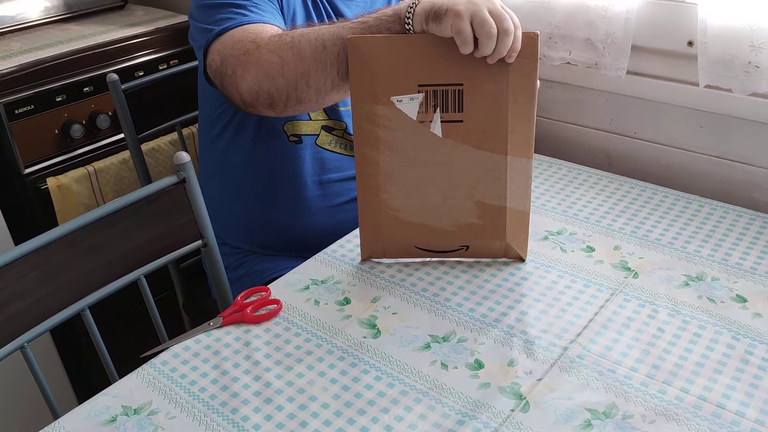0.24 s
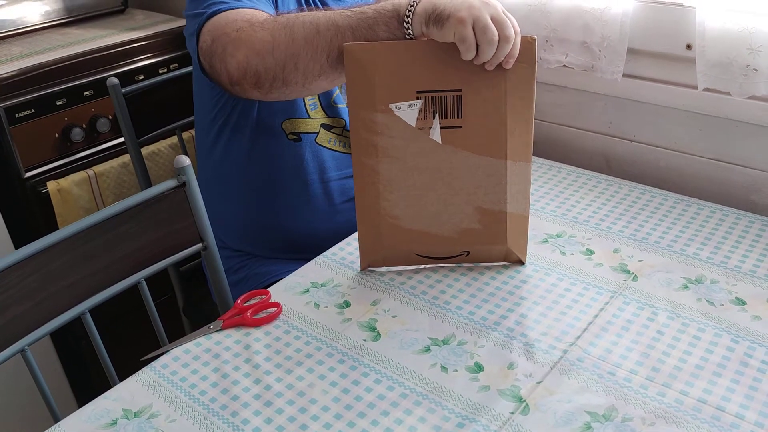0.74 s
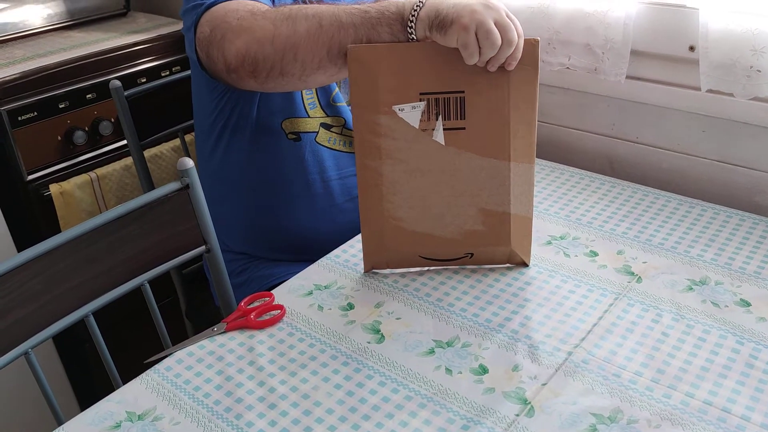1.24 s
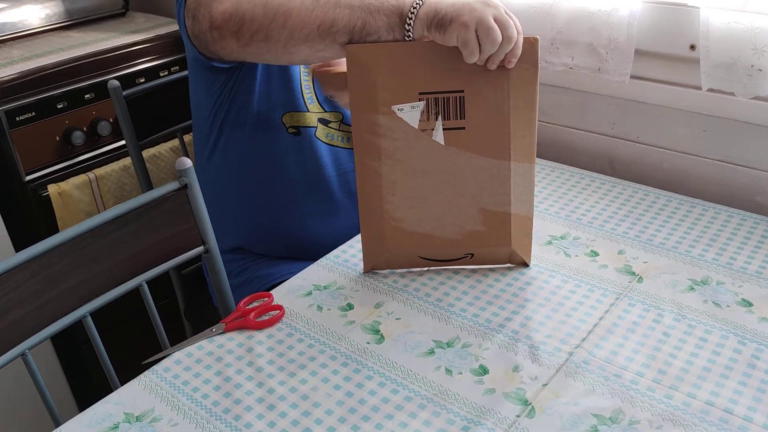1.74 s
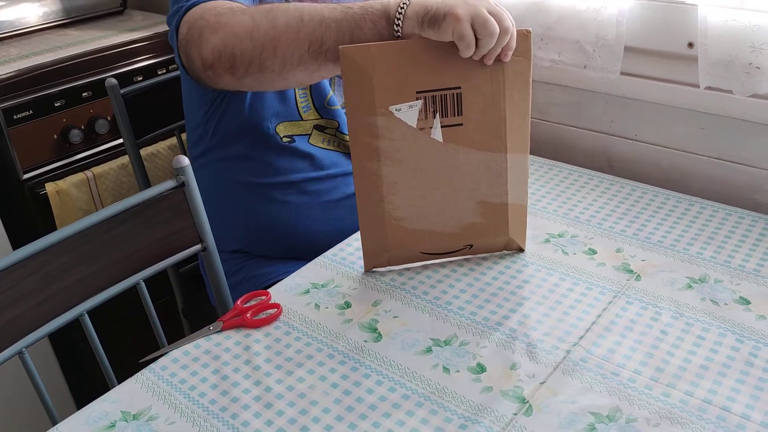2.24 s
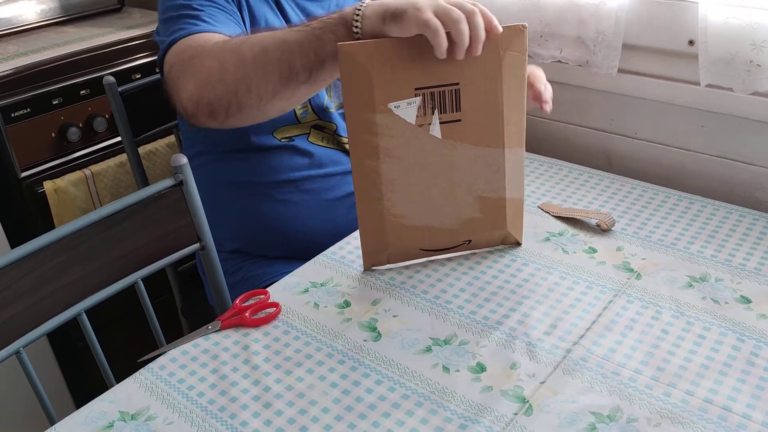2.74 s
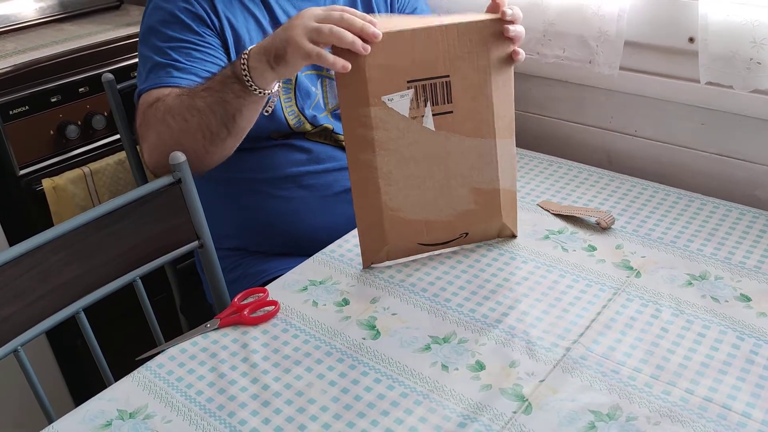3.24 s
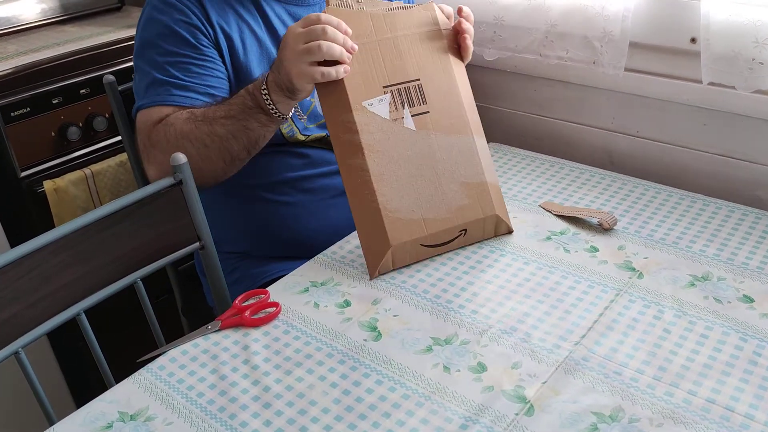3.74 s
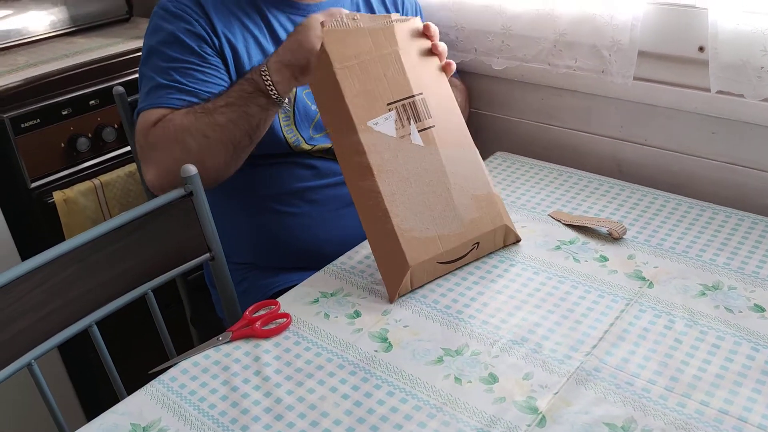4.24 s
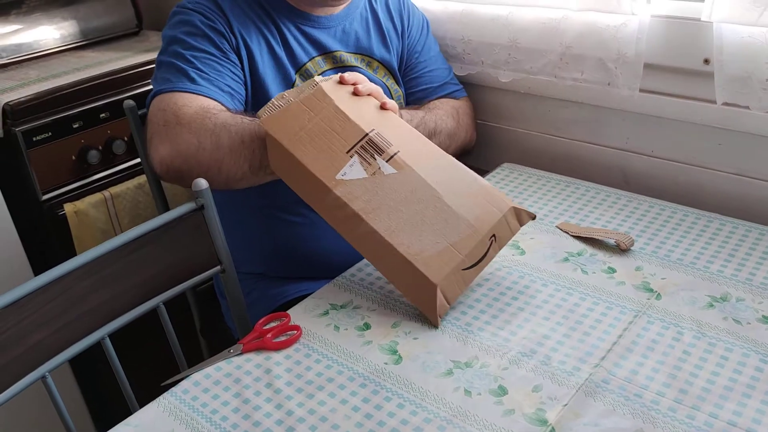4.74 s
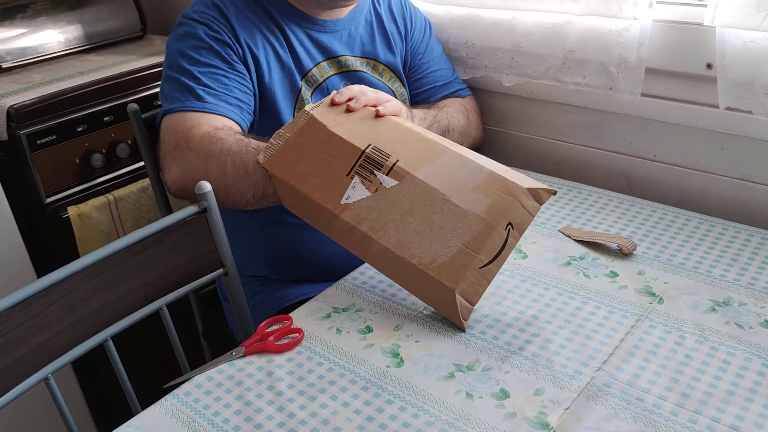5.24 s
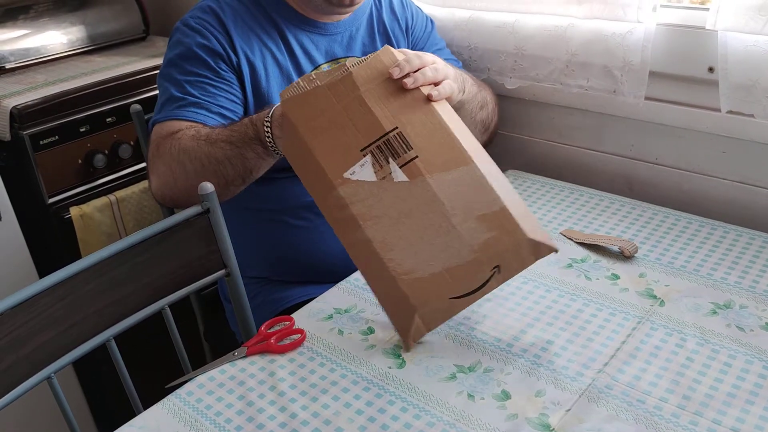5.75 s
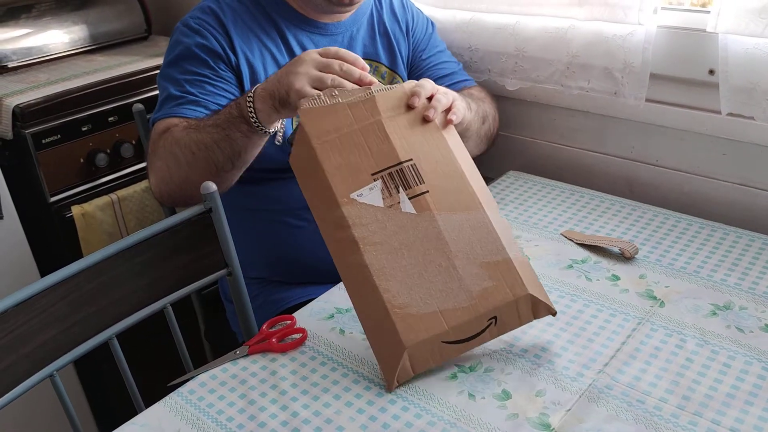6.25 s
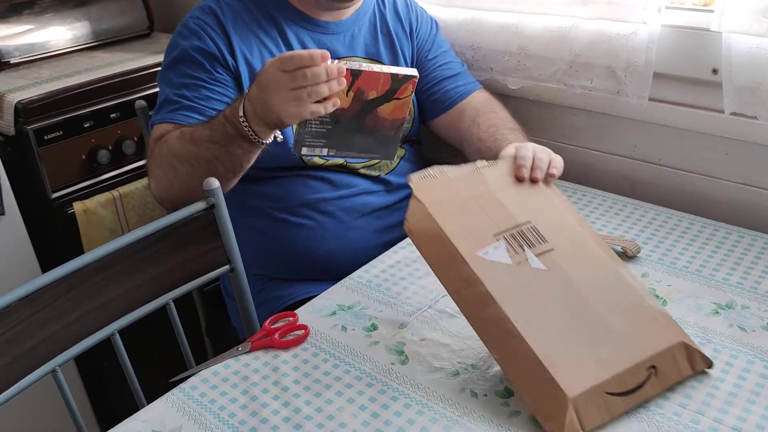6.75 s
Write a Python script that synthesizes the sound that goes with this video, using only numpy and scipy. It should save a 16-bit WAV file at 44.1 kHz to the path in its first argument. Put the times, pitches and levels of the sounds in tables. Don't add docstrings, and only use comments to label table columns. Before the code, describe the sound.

In a quiet kitchen, stiff cardboard tears in crackling bursts, followed by dry rubbing, creaking folds and small clicks while hands work something out.

```python
import sys
import numpy as np
from scipy import signal
from scipy.fft import rfft, irfft, next_fast_len
from scipy.io import wavfile
from scipy.ndimage import uniform_filter1d, map_coordinates

SR = 44100
rng = np.random.default_rng(int(sys.argv[2]) if len(sys.argv) > 2 else 0)


def file_out(sig):
    cols = np.atleast_2d(sig).T
    lim = np.clip(cols, -1, 1)
    pcm = np.round(lim * 32767).astype(np.int16)
    wavfile.write(sys.argv[1], SR, pcm)


def natural_amplitude(level_db):
    exponent = np.asarray(level_db, float) / 20
    return 10 ** exponent


N = 309141

# freq_hz, density_db_per_hz
HUSH_SPECTRUM = [(59, -30.5), (100, -10.5), (229, -8), (295, -3.5), (350, -6), (1060, -12), (3300, -22.5),
                 (8000, -22.5), (11400, -50.5), (13200, -31.5), (16000, -27)]
# freq_hz, left_right_likeness
HUSH_LIKENESS = [(60, -2.5), (240, 0.91), (950, 0.25), (3770, 0), (15000, -0.3)]
HUSH_DB = -61

# freq_hz, level_db
THUD_SPECTRUM = [(40, -32), (60, -4), (100, -2.5), (140, -2), (200, -14), (300, -51.5)]
# freq_hz, level_db
SWAY_SPECTRUM = [(3, 5), (25, -13.5), (41, -11), (49, -2), (58, -16), (70, -24), (120, -46)]
# time_s, level_db
BUMPS = [(0.108, -56.5), (0.51, -61.5), (0.64, -64), (0.879, -51.5), (1.25, -52), (1.42, -47), (1.65, -47),
         (1.72, -44), (1.828, -46), (2.1, -79), (2.22, -69), (2.319, -69.5), (2.7, -59), (3.28, -62),
         (3.49, -61), (3.77, -52.5), (3.88, -72), (4.07, -79), (4.45, -65), (4.76, -61.5), (4.96, -62.5),
         (5.25, -52), (5.54, -52.5), (5.93, -53), (6.15, -69), (6.44, -54), (7.0, -68)]
# time_s, length_s, level_over_sway_db
LURCHES = [(0.1, 0.036, 7.3), (2.32, .05, 10), (3.75, 0.035, 9.3), (3.93, .1, 4)]
LURCH_HZ = 16
LEAN_DB_PER_S, SETTLE_DB_PER_S, STILL_DB = 227, 142.5, -71.5
SWAY_DB, SWAY_SWING_DB = -59, 1.5

# freq_hz, level_db
SKIN_SPECTRUM = [(2000, -27.5), (3000, -8.5), (4200, -1.5), (5500, -2), (7000, 2), (8150, -1.5),
                 (8600, -14), (9500, -14.5), (11000, -12.5), (15000, -11), (17000, -20)]
# freq_hz, width_hz, level_db
HELD_FACE_MODES = [(1380, 800, 16), (2490, 1200, 16)]
# freq_hz, width_hz, level_db
SLEEVE_MODES = [(96.5, 13, -6), (195.2, 32, -4), (310, 32, -6), (420, 26, 2), (700, 310, -4),
                (850, 263, 0.5)]
# start_s, length_s, fibre_db, grip_db, sleeve_note_hz
PICKING = [(0.07, 0.026, -74, -23, 303), (0.0, 0.012, -61, 9, 540), (0.045, 0.029, -67, -18, 293),
           (0.12, 0.039, -81, 19.5, 307), (0.3, 0.25, -60.5, -8, 460), (0.425, 0.061, -60, 9, 425),
           (0.478, 0.053, -51.5, 4.5, 430), (0.54, 0.075, -50, -3, 537), (0.68, 0.09, -53.5, 3, 426),
           (0.81, 0.066, -55.5, 6.5, 606), (0.858, 0.008, -39, -0.5, 635), (0.94, 0.02, -60, -13.5, 456),
           (1.09, 0.056, -53.5, 1.5, 560), (1.236, 0.15, -40, -12, 497), (1.34, 0.081, -33, -12.5, 462)]
# start_s, length_s, fibre_db, grip_db, sleeve_note_hz
HANDLING = [(2.554, 0.089, -48, -15.5, 330), (2.676, 0.049, -48.5, -0.5, 360), (2.729, 0.2, -50.5, -9, 510),
            (2.879, 0.086, -48, 2.5, 520), (2.96, 0.25, -46, -3.5, 507), (3.169, 0.13, -54.5, -1, 330),
            (3.239, 0.066, -61, 2.5, 325.7), (3.32, 0.067, -53.5, 3, 665), (3.421, 0.028, -44.5, -1.5, 564),
            (3.48, 0.094, -54, 0, 403), (3.599, 0.044, -49, -0.5, 663), (3.75, 0.058, -63, 8.5, 310),
            (3.842, 0.059, -52.5, 9, 684), (3.96, 0.077, -49, -1.5, 530), (3.999, 0.032, -49.5, -2.5, 480.6),
            (4.06, 0.052, -58.5, -3, 509), (4.164, 0.09, -81, 27, 810), (4.259, 0.18, -62.5, 4, 509),
            (4.43, 0.061, -40.5, -18, 484), (4.46, 0.072, -41, -16, 486), (4.549, 0.17, -39.5, 0, 700),
            (4.698, 0.24, -47, 3.5, 670), (4.951, 0.022, -41, 0.5, 487), (5.002, 0.14, -47, 2, 550),
            (5.15, 0.25, -49, 9.5, 520), (5.359, 0.1, -44, 7, 470), (5.417, 0.2, -40, -3, 492),
            (5.589, 0.26, -44.5, 0, 597), (5.748, 0.13, -43, -16, 410), (5.8, 0.14, -39.5, -8.5, 420),
            (5.93, 0.087, -48.5, 0, 437), (6.04, 0.4, -54.5, 2.5, 570), (6.117, 0.17, -49, -0.5, 584),
            (6.3, 0.31, -45.5, -5, 617), (6.49, 0.28, -54.5, -7, 836), (6.599, 0.058, -46.5, -8, 600),
            (6.68, 0.19, -45.5, -6, 670), (6.88, 0.034, -48.5, -19, 440), (6.975, 0.065, -49.5, 8, 550)]
# start_s, length_s, fibre_db, grip_db, sleeve_note_hz
SCRAPES = [(1.98, 0.19, -53.5, 5, 700), (2.83, 0.059, -51.5, 9, 560), (3.63, 0.047, -46, 14, 780),
           (4.242, 0.13, -67, 16, 453), (6.165, 0.083, -54.5, 6, 600)]
# start_s, length_s, fibre_db, grip_db, sleeve_note_hz
SQUEEZES = [(2.903, 0.077, -72, 2, 340), (4.453, 0.03, -61, 18.5, 454), (4.58, 0.032, -51, 16, 690),
            (4.62, 0.095, -59, 18.5, 400), (5.254, 0.026, -55, 10, 680), (3.2, 0.025, -62.5, 13, 440),
            (4.97, 0.037, -66, 8, 490), (5.385, 0.027, -55, 15, 440), (4.19, 0.033, -78, 18, 450),
            (7.3, 0.018, -62, 14, 330), (5.46, 0.068, -53, -6, 470), (5.815, 0.065, -53.5, 15, 450),
            (6.488, 0.12, -58.5, 21, 900)]
RESTING_DB = [-82.5, -83.5, -77.5]
# time_s, pitch_hz
FACE_NOTE = [(0, 1480), (2.0, 1900), (2.3, 1900), (2.7, 1503), (3.0, 1770), (3.45, 1630), (3.68, 2200),
             (3.9, 1210), (4.05, 2036), (4.219, 1200), (4.6, 1660), (4.97, 2270), (5.45, 1570),
             (5.62, 1585), (5.85, 2450), (6.149, 1340), (6.28, 1450), (7, 1900)]
TOUCH_S, TIRE_DB_PER_S, LIFT_DB_PER_S = 0.0052, 24, 259.5
SWELL_SHARE = 0.11
FACE_GRIP, SLEEVE_GRIP, SLEEVE_DB = 0.58, 1.25, -4
SCRAPE_SLEEVE_DB = -21
SQUEEZE_FACE_DB, SQUEEZE_WALLS_DB = -21, -9
LET_GO_S, LET_GO_DB = (2.18, 2.555), -4.5
HELD_WALLS_DB, AIR_DB, AIR_WIDTH_HZ = -0.5, 15.5, 100
FACE_DB, FACE_WIDTH_HZ = 8, 600

# freq_hz, width_hz, level_db
GLOSS_MODES = [(5800, 1800, 0)]
NAIL_S, NAIL_DB, NAIL_T60_S = 0.045, -56.5, 0.13

# freq_hz, level_db
CRACK_SPECTRUM = [(2200, -43.5), (3200, -3.5), (4500, 13.5), (6000, 4.5), (8100, 7.5), (8700, -14),
                  (9700, -16.5), (15000, -5), (17000, -20)]
# freq_hz, width_hz, level_db
POP_MODES = [(1020, 580, -1), (1610, 180, 3.5), (1770, 320, 0.5), (2540, 240, 0.5), (3420, 610, -11),
             (4300, 930, -15.5)]
# time_s, peak_db, fibre_rel_db, sleeve_pitch_hz
POPS = [(0.7113, -34, -31, 686), (0.8719, -23.5, 8, 302), (1.105, -41, -10, 490), (1.6068, -24, 10.5, 790),
        (1.801, -18, 4, 395), (2.6766, -36, -17, 296), (3.241, -31, -7, 310), (3.891, -28.5, 0, 914),
        (4.553, -18, 0.5, 765), (4.558, -27, -10, 330), (5.1671, -27, -3, 335)]
# time_s, peak_db, fibre_rel_db, sleeve_pitch_hz
FLICKS = [
    (0.05, -47, 0, 465),
    (0.462, -43, 5, 350),
    (0.4825, -24, -10, 310),
    (1.2765, -26, 7, 600),
    (2.565, -58, 11, 754),
]
# time_s, peak_db, fibre_rel_db, sleeve_pitch_hz
CRUMPLES = [(0.322, -49, 0, 320), (0.5816, -36.5, -23, 338), (0.6054, -33, -6, 850),
            (1.07, -39.5, -32, 250), (1.3652, -10, -32.5, 795), (1.8264, -6, -34, 426),
            (3.447, -34, 7.5, 357), (3.4555, -26, -11, 680), (4.9575, -36, 2.5, 424),
            (6.9865, -26, -2, 493)]
# time_s, peak_db, fibre_rel_db, sleeve_pitch_hz
KNOCKS = [(1.2357, -50.5, 19, 332), (3.484, -49, -19, 298), (3.757, -53, -18, 193), (4.188, -54, -16, 407),
          (4.221, -60.5, -19, 490), (4.2542, -54, -26, 500), (5.3715, -26, -9, 440),
          (5.3914, -37, 8.5, 435), (4.961, -51, -10, 460), (4.985, -49.5, -10, 491), (5.852, -55, -10, 426),
          (6.198, -57, -15, 305), (6.584, -57, -15, 259), (5.9384, -44, -9, 330), (6.134, -48.5, 2, 840),
          (6.27, -48, -15, 600), (6.5804, -42, -12, 672), (6.99, -49, -11, 240)]
# time_s, peak_db, fibre_rel_db, sleeve_pitch_hz
CRINKLES = [(2.6066, -59.5, 15, 488), (3.6148, -52, 1, 600), (3.6328, -41, 1, 580), (3.668, -40, -3, 700),
            (3.68, -43.5, 13.5, 700), (4.1685, -61.5, -12, 504), (4.1835, -49.5, -20, 610),
            (4.2439, -62, -12, 500), (4.283, -54, -12, 450), (4.57, -29, -4, 600), (4.582, -33, -4, 500),
            (4.69, -43, -7, 600), (4.732, -34.5, -12, 700), (4.8295, -39, -4, 605), (4.97, -36, 7.5, 445),
            (0.876, -28, 2, 402), (4.961, -30, -11, 500), (4.995, -40, -1, 505), (3.4457, -38, 3, 497),
            (3.9874, -47, 7.5, 500), (4.2658, -52, -1, 500), (4.657, -48, -3, 600), (4.78, -35.5, -14, 700),
            (5.245, -36, 0, 600), (5.88, -39, 4, 450), (6.215, -45, -6, 600), (6.245, -40, -8, 600),
            (6.272, -45, -2, 700), (6.992, -39, -5, 500), (5.2316, -37, -5, 600), (5.598, -34, -10, 900),
            (6.18, -53, -9, 600), (6.608, -56.5, -14, 700)]
# rows, sleeve_rel_db, length_s
CREASE_KINDS = [(POPS, -5, 0.021), (FLICKS, -8, 0.014), (CRUMPLES, -11, 0.056),
                (KNOCKS, 11.6, 0.016), (CRINKLES, -15.5, 0.014)]

# freq_hz, level_db
FIBRE_SPECTRUM = [(2200, -49.5), (3200, -11.5), (4000, -9), (5500, -4), (7400, 2.5), (8150, -4.5),
                  (8600, -20), (9600, -21.5), (11000, -15.5), (15000, -17.5), (17000, -47)]
# freq_hz, width_hz, level_db
TAUT_FACE_MODES = [(1250, 890, 0), (1900, 460, 11), (2510, 1500, 8), (2950, 1400, 0)]
# start_s, climb_s, fibre_peak_db, let_go_db_per_s, face_rel_db
TUGS = [
    (0.871, 0.0021, -26.5, 293.5, 3),
    (1.366, 0.051, -16.5, 332.5, 3),
    (1.606, 0.063, -19.5, 262, 2),
    (1.69, 0.0055, -29.5, 301, -12),
    (1.8, 0.03, -16.5, 496.5, -7.5),
]
# time_s, fibre_peak_db, face_rel_db
SNAGS = [(0.874, -23, 4), (0.879, -25, 4), (0.882, -12, 2), (0.89, -26, 4), (1.3656, -24.5, 16),
         (1.371, -23.5, 7.5), (1.374, -22, 9.5), (1.381, -24.5, 9), (1.387, -20, 2.5), (1.3915, -20, 6),
         (1.396, -19, 8), (1.403, -18, 5), (1.408, -18, 5), (1.414, -16, 8), (1.419, -19, 4),
         (1.423, -18, 4), (1.428, -17, 3), (1.429, -19, 1), (1.434, -16, 2), (1.438, -17, 0),
         (1.443, -14.5, -2), (1.4506, -6, -3), (1.456, -12.5, -7.5), (1.46, -14.5, -5), (1.467, -18.5, -5),
         (1.6088, -13, -2), (1.613, -15, -2), (1.6206, -13, 1.5), (1.628, -5.5, 0), (1.633, -16, -1),
         (1.64, -17, -6), (1.642, -20, -5.5), (1.65, -11, -10), (1.658, -11.5, -5.5), (1.663, -9, -6),
         (1.672, -17, -0.5), (1.674, -16, -3.5), (1.68, -18.5, 0), (1.688, -18.5, 0), (1.697, -18, 0.5),
         (1.706, -17.5, -4.5), (1.8107, -24, 2.5), (1.813, -25.5, 7.5), (1.822, -12.5, 2.5),
         (1.831, -19.5, 3.5), (1.833, -7.5, 6.5), (1.838, -16, 3), (1.8401, -12, 6), (1.844, -18, -3),
         (1.85, -22.5, -4)]
# time_s, pitch_hz
TEAR_NOTE = [(0.87, 2000), (1.37, 1900), (1.42, 2300), (1.47, 2450), (1.6, 1900), (1.68, 2050), (1.8, 1350),
             (1.83, 1500), (1.86, 2100)]
BITE_S, BITE_DB, CLIMB_DB = 0.031, 11, 1.5
HOLLOW_DB, HOLLOW_GROWS, HOLLOW_LET_GO = -2.5, 0.94, 0.32
SNAG_T60_S, SNAG_HOLLOW_DB, SNAG_HOLLOW_GRIP = 0.0086, -11, 0.4
SNAG_TICK = 4.2
TEAR_DB, TEAR_WIDTH_HZ = 4.5, 500

# freq_hz, left_right_likeness
ECHO_LIKENESS = [(60, 0.51), (180, 0.83), (550, 0.66), (1650, -0.2), (4970, 0.21), (15000, -0.21)]
# freq_hz, t60_s
KITCHEN_T60 = [(100, 0.15), (400, 0.22), (1000, 0.3), (2500, 0.2), (6000, 0.24), (12000, 0.21)]
# freq_hz, t60_s
HALL_T60 = [(100, 0.3), (500, 0.47), (2000, 0.66), (5000, 0.58), (12000, 0.21)]
TOP_HZ = 15800


def unit(x):
    return x / np.sqrt(np.mean(x ** 2) + 1e-20)


def along(points, hz):
    f, v = np.transpose(points)
    return np.interp(np.log(hz + 1), np.log(f + 1), v)


def drifting(per_s):
    return map_coordinates(rng.standard_normal(60), [np.arange(N) * per_s / SR])


def filtered(x, response):
    n = x.shape[-1]
    size = next_fast_len(n + 8192)
    spectrum = rfft(x, size) * response(np.fft.rfftfreq(size, 1 / SR))
    return irfft(spectrum, size)[..., :n]


def coloured(points):
    return lambda f: unit(natural_amplitude(along(points, f)))


def resonant(modes):
    def raw(f):
        total = 0
        for k, (centre, width, db) in enumerate(modes):
            damping = 1j * f * width
            total = total + (-1) ** k * natural_amplitude(db) * damping / (centre * centre - f * f + damping)
        return total

    return lambda f: raw(f) / np.sqrt(np.mean(abs(raw(f)) ** 2))


def moving(x, hz, width_hz):
    turn = np.cumsum(2 * np.pi * hz / SR)
    slow = lambda f: 1 / (1 + 2j * f / width_hz)
    return 2 * sum(wave(turn) * filtered(x * wave(turn), slow) for wave in (np.sin, np.cos))


def paired(noise, likeness):
    turn = lambda hz: np.arccos(np.clip(along(likeness, hz), -1, 1)) / 2
    mid, side = filtered(noise, lambda hz: np.array([np.cos(turn(hz)), np.sin(turn(hz))]))
    return np.array([mid + side, mid - side])


def grit(rate, spread_db, smooth, clump_db):
    sizes = natural_amplitude(spread_db * np.minimum(rng.exponential(size=N), 3))
    ticks = (rng.random(N) < rate / SR) * rng.standard_normal(N) * sizes
    clumps = map_coordinates(rng.standard_normal(N // 300 + 4), [np.arange(N) / 300])
    mixed = np.sqrt(1 - smooth) * unit(ticks) + np.sqrt(smooth) * rng.standard_normal(N)
    return unit(natural_amplitude(clump_db * clumps) * mixed)


def stroke(levels, force, fibres, face, walls_db=0, phase=-1):
    to_fibres, to_face, to_walls = uniform_filter1d(levels, size=32, axis=1) * force
    crackle = filtered(to_fibres, lambda f: phase * coloured(fibres)(f))
    ring = filtered(to_face, resonant(face))
    hum = filtered(to_walls, lambda f: natural_amplitude(walls_db) * resonant(SLEEVE_MODES)(f))
    return crackle + ring + hum


def hush():
    noise = paired(rng.standard_normal((2, N)), HUSH_LIKENESS)
    noise = filtered(noise, lambda hz: natural_amplitude(along(HUSH_SPECTRUM, hz)))
    return natural_amplitude(HUSH_DB + 2 * drifting(per_s=6)) * unit(noise)


def table():
    t, weight = np.arange(N) / SR, natural_amplitude(STILL_DB)
    for s, db in BUMPS:
        lean_db = LEAN_DB_PER_S * np.maximum(s - t, 0)
        settle_db = SETTLE_DB_PER_S * np.maximum(t - s, 0)
        weight = np.hypot(weight, natural_amplitude(db - lean_db - settle_db))
    bumps = filtered(paired(rng.standard_normal((2, N)), [(100, .9)]), coloured(THUD_SPECTRUM))
    sway = filtered(paired(rng.standard_normal((2, N)), [(25, 0.28)]), coloured(SWAY_SPECTRUM))
    for s, length, db in LURCHES:
        rock = np.exp(-((t - s) / length) ** 2) * np.sin(2 * np.pi * LURCH_HZ * (t - s))
        sway = sway + natural_amplitude(db) * np.array([rock, .6 * rock])
    sway_level = natural_amplitude(SWAY_DB + SWAY_SWING_DB * drifting(per_s=7))
    return natural_amplitude([[1.1], [-1.1]]) * (weight * bumps + sway_level * sway)


def hands():
    rows = sorted(PICKING + HANDLING + SCRAPES + SQUEEZES)
    fibres_db, face_db, sleeve_db = RESTING_DB
    power = natural_amplitude([fibres_db, face_db, sleeve_db, sleeve_db])[:, None] ** 2 * np.ones(N + SR)
    power[:, round(LET_GO_S[0] * SR):round(LET_GO_S[1] * SR)] *= natural_amplitude(2 * LET_GO_DB)
    u = np.arange(SR // 2) / SR
    for row in rows:
        s, length, db, grip_db, _ = row
        face_db = FACE_GRIP * grip_db + SQUEEZE_FACE_DB * (row in SQUEEZES)
        air_db = SLEEVE_GRIP * grip_db + SLEEVE_DB + SCRAPE_SLEEVE_DB * (row in SCRAPES)
        walls_db = air_db + SQUEEZE_WALLS_DB * (row in SQUEEZES)
        rise = np.minimum(u / (TOUCH_S + SWELL_SHARE * length), 1)
        shape = rise * natural_amplitude(db - TIRE_DB_PER_S * u - LIFT_DB_PER_S * np.maximum(u - length, 0))
        push = shape * natural_amplitude([[0], [face_db], [walls_db], [air_db]])
        power[:, max(round(s * SR), 0):][:, :len(u)] += push ** 2
    s, length, *_, hz = np.transpose(rows)
    return np.sqrt(power[:, :N]), np.interp(np.arange(N) / SR, s + length / 2, hz)


def rubbing():
    levels, air_hz = hands()
    force = grit(rate=1800, spread_db=3, smooth=.33, clump_db=2)
    face_hz = np.interp(np.arange(N) / SR, *np.transpose(FACE_NOTE))
    air = natural_amplitude(AIR_DB) * moving(levels[3] * force, air_hz, AIR_WIDTH_HZ)
    face = natural_amplitude(FACE_DB) * moving(levels[1] * force[::-1], face_hz, FACE_WIDTH_HZ)
    card = stroke(levels[:3], force, SKIN_SPECTRUM, HELD_FACE_MODES, walls_db=HELD_WALLS_DB)
    return card + air + face


def nail():
    u = np.arange(N) / SR - NAIL_S
    hiss = (u > 0) * natural_amplitude(NAIL_DB - 60 * abs(u) / NAIL_T60_S) * rng.standard_normal(N)
    return filtered(filtered(hiss, resonant(GLOSS_MODES)), resonant(GLOSS_MODES))


def creases():
    out, t = np.zeros((3, N + SR)), np.arange(SR // 5) / SR
    for rows, sleeve_db, life in CREASE_KINDS:
        sharp = (0.017 / life) ** 2
        swell = natural_amplitude(-60 * t / life) * (1 - np.exp(-t / (0.08 * life)))
        envelope = swell + 1.13 * sharp * natural_amplitude(-60 * t / 0.0072)
        for s, db, fibre_db, hz in rows:
            burst = rng.standard_normal(len(t)) * envelope
            burst[0] = 3.3 * sharp
            ring = np.sin(2 * np.pi * hz * t) * natural_amplitude(-60 * t / 0.022) * (1 - np.exp(-t / 0.00023))
            walls = ring + .55 * burst
            parts = np.array([natural_amplitude(fibre_db) * burst, burst, natural_amplitude(sleeve_db + 10.0) * walls])
            out[:, round(s * SR):][:, :len(t)] += natural_amplitude(db) * parts

    def small_sleeve(f):
        return (1j * f / (150 + 1j * f) / (1 + 1j * f / 900)) ** 2 / (1 + 1j * f / 1200)

    fibres, face, sleeve = out[:, :N]
    crack = filtered(fibres, coloured(CRACK_SPECTRUM))
    return crack + filtered(face, resonant(POP_MODES)) + filtered(sleeve, small_sleeve)


def tugs():
    force = np.zeros((3, N))
    for s, climb, db, fall_db, face_db in TUGS:
        u = np.arange(N) / SR - s
        bite = min(BITE_S, climb / 2)
        fall = fall_db * np.maximum(u - climb, 0)
        gather = np.interp(u, [0, bite, climb], [db - CLIMB_DB - BITE_DB, db - CLIMB_DB, db])
        level = gather - fall
        hollow = level - HOLLOW_LET_GO * fall + HOLLOW_DB + HOLLOW_GROWS * (db + 20.5)
        force += (u >= 0) * natural_amplitude([level, level + face_db, hollow])
    u = np.arange(SR // 20) / SR
    for s, db, face_db in SNAGS:
        shares = natural_amplitude([[0], [face_db], [SNAG_HOLLOW_GRIP * face_db + SNAG_HOLLOW_DB]])
        force[:, round(s * SR):][:, :len(u)] += natural_amplitude(db - 60 * u / SNAG_T60_S) * shares
    return force


def ripping():
    force = grit(rate=2000, spread_db=3.5, smooth=.22, clump_db=2.2)
    breaks = np.round(np.transpose(SNAGS)[0] * SR).astype(int) + 16
    force[breaks] = SNAG_TICK * np.sign(force[breaks])
    levels = tugs()
    note_hz = np.interp(np.arange(N) / SR, *np.transpose(TEAR_NOTE))
    flap = natural_amplitude(TEAR_DB) * moving(levels[1] * force, note_hz, TEAR_WIDTH_HZ)
    return stroke(levels, force, FIBRE_SPECTRUM, TAUT_FACE_MODES, phase=-1j) + flap


def colour_patches(x, patchy_db):
    z = signal.stft(x, SR, nperseg=512)[2]
    field = uniform_filter1d(rng.standard_normal(z.shape), size=6, axis=0)
    field = uniform_filter1d(field, size=10, axis=1)
    return signal.istft(z * natural_amplitude(patchy_db * unit(field)), SR, nperseg=512)[1][:N]


def kitchen(x, direct_db, bounce_db, hall_db, gap_s):
    step, out = SR // 8, np.zeros((2, N + 2 * SR))
    fade = np.sqrt(np.hanning(2 * step + 1)[:-1])
    padded = np.pad(x, (step, 2 * step))
    for start in range(0, N + step, step):
        hz, t, z = signal.stft(rng.standard_normal((2, SR // 2)), SR, nperseg=256)
        near = natural_amplitude(-60 * t / along(KITCHEN_T60, hz)[:, None])
        far = natural_amplitude(hall_db - 60 * t / along(HALL_T60, hz)[:, None])
        decay = near + far
        decay /= np.linalg.norm(decay, axis=1, keepdims=True)
        tail = paired(signal.istft(z * decay, SR, nperseg=256)[1], ECHO_LIKENESS)
        tail *= 1 - np.exp(-np.arange(tail.shape[1]) / (SR * gap_s))
        tail *= np.sqrt(2) / np.linalg.norm(tail)
        tail[[0, 1], [rng.integers(1, 9), 0]] += natural_amplitude(direct_db)
        arrivals = rng.integers(20, 260, size=4) + rng.integers(0, 14, size=(2, 4))
        tail[[[0], [1]], arrivals] += natural_amplitude(bounce_db)
        wet = signal.fftconvolve((fade * padded[start:start + 2 * step])[None], tail, axes=1)
        out[:, start:start + wet.shape[1]] += wet
    return out[:, step:step + N]


def scene():
    def table_dip(f):
        damping = 1j * f * 500
        return 1 - 0.6 * damping / (1040 ** 2 - f * f + damping)

    small = lambda f: (1j * f / (70 + 1j * f)) ** 2
    patchy = colour_patches(filtered(ripping(), table_dip) + rubbing(), patchy_db=1.8)
    pops = filtered(natural_amplitude(-6.0) * creases(), small) + nail()
    card = filtered(natural_amplitude(-6.0) * patchy, small) + pops
    facing = natural_amplitude(-10) * np.array([np.roll(pops, shift=4), pops])
    room = kitchen(card, direct_db=-2.0, bounce_db=-15.0, hall_db=-18.5, gap_s=0.0037)
    return natural_amplitude([[.4], [-.4]]) * room + facing + table() + hush()


def holes(x, share, depth_db, from_hz, to_hz):
    hz, _, z = signal.stft(x, SR, nperseg=1024, noverlap=768)
    starts = rng.random((len(hz) // 4 + 1, z.shape[2])) < share / 6
    lasting = uniform_filter1d(starts * 1., size=6, axis=1) > .01
    dropped = np.repeat(lasting, 4, axis=0)[:len(hz)]
    in_range = ((hz > from_hz) & (hz < to_hz))[:, None]
    gain = natural_amplitude(-depth_db * dropped * in_range) * (hz[:, None] < TOP_HZ)
    return signal.istft(z * gain, SR, nperseg=1024, noverlap=768)[1][:, :N]


def roll_off(x):
    return signal.sosfilt(signal.butter(12, 16990, fs=SR, output="sos"), x)


def record(dry):
    clean = holes(dry, share=.17, depth_db=30, from_hz=2700, to_hz=8500)
    clean = holes(clean, share=.34, depth_db=40, from_hz=8500, to_hz=15900)
    limited = clean / (1 + abs(clean / .95) ** 4) ** (1 / 4)
    return roll_off(limited)


dry = scene()
out = record(dry)
file_out(out)
```